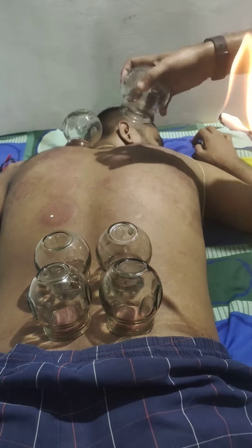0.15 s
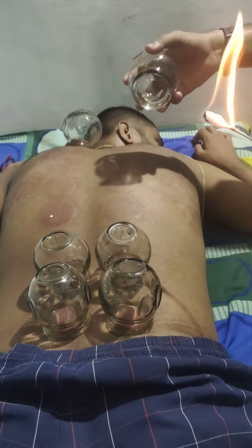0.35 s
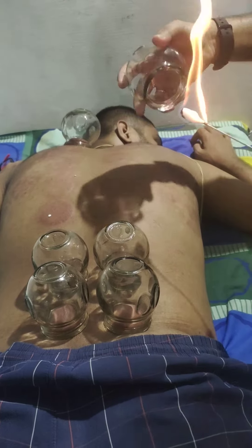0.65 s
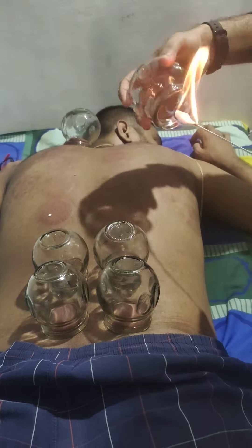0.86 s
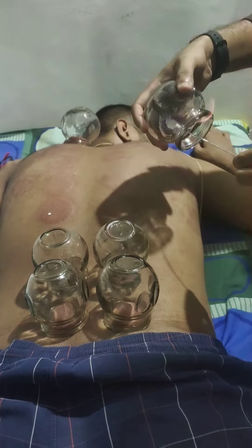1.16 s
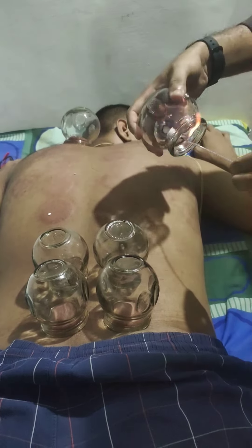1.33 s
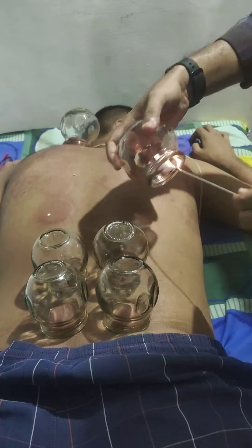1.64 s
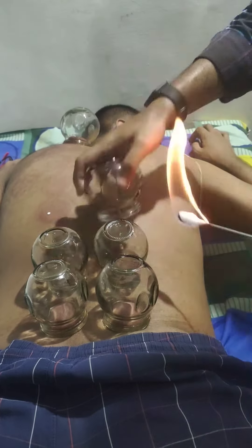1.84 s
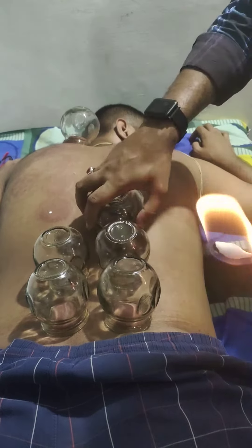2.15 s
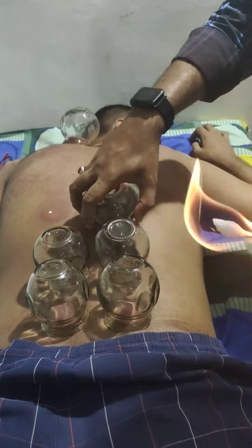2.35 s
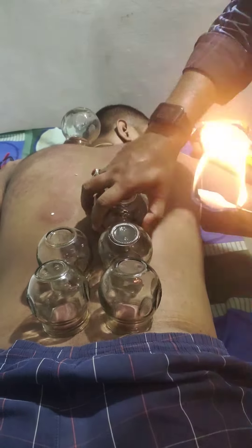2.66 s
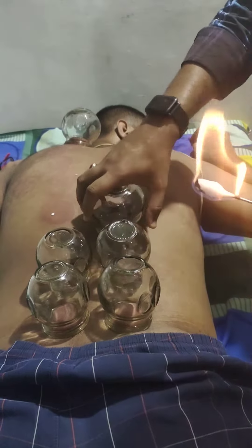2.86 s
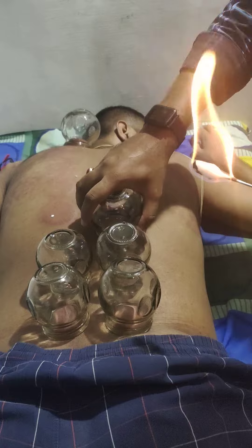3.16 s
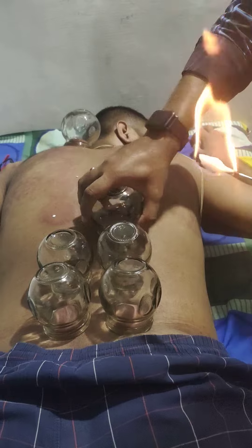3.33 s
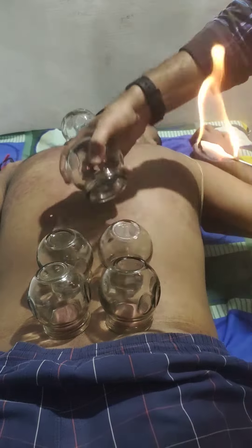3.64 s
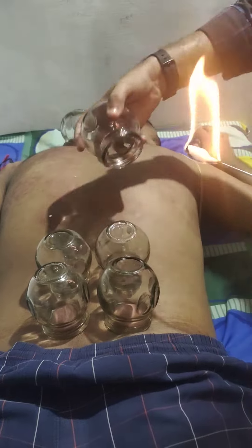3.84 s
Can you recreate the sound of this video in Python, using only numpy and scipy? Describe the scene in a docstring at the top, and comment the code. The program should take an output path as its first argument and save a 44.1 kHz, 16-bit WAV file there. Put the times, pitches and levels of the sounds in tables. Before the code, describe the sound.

Glass cups clink and knock close by in a small room. At first there is only a faint fan hum, distant cricket chirps and a soft flame flutter. From about 1.9 to 3.3 seconds, the cups chatter together in short bursts. At 3.5 seconds one pulls off the skin with a brief hiss and a rising pop, then bounces against another, the clinks quickening and fading by 3.8 seconds.

```python
"""A small bare room, during fire cupping. A glass cup is set on a back and chatters against its
neighbours as it is shifted. Pulled off, it sucks air past its rim, pops with a rising note and
bounces against the next cup. Behind it the torch flame flutters, a fan throbs, thin tones hang
in the room and a cricket chirps faintly."""
import sys
import numpy as np
from scipy import signal
from scipy.fft import rfft, irfft, next_fast_len
from scipy.io import wavfile
from scipy.ndimage import map_coordinates

SR = 44100
rng = np.random.default_rng(int(sys.argv[2]) if len(sys.argv) > 2 else 0)


def master(y):
    """Save y as 16-bit WAV."""
    cut = np.clip(np.atleast_2d(y).T, -1, 1)
    pcm = np.round(cut * 32767)  # scale
    wavfile.write(sys.argv[1], SR, pcm.astype(np.int16))


N = 176400
T = np.arange(N) / SR

# The bright colour of the rim hiss and the ticks. Each row: frequency in Hz, gain in dB.
BRIGHT_COLOUR = [(200, -13), (900, -5.5), (1800, -0.5), (3300, -10.5), (5000, -5), (7000, 1), (10000, -7.5),
                 (11500, 1.5), (13300, 1.5), (15300, -10)]


def from_db(db):
    """Decibels to gain."""
    return 10 ** (np.asarray(db) / 20)


def rms_one(x):
    """Scale to unit power."""
    return x / np.sqrt(np.mean(x ** 2) + 1e-20)


def pan(db):
    """Left and right gains; positive dB leans left."""
    return from_db(np.array([[.5], [-.5]]) * db)


def fader(points):
    """Ride the gain through (seconds, dB) points, silent outside them."""
    return from_db(np.interp(T, *np.transpose(points), left=-200, right=-200))


def at_hz(points, hz):
    """Read a table on a log-frequency axis."""
    freqs, values = np.transpose(points)
    return np.interp(np.log(hz + 1), np.log(freqs), values)


def colour(x, spectrum, size=16384):
    """Minimum-phase EQ through (Hz, dB) points."""
    gain = from_db(at_hz(spectrum, np.fft.rfftfreq(size, 1 / SR)))
    cepstrum = irfft(np.log(gain))
    cepstrum[1:size // 2] *= 2
    cepstrum[size // 2 + 1:] = 0
    impulse = irfft(np.exp(rfft(cepstrum)))
    padded = next_fast_len(N + size, real=True)
    return irfft(rfft(x, padded) * rfft(impulse, padded), padded)[..., :N]


def clicks(rows):
    """One impulse per (seconds, dB) row."""
    out = np.zeros(N)
    for s, db in rows:
        out[int(s * SR)] += from_db(db)
    return out


def ring(x, hz, t60):
    """A resonator: a unit click starts a sine of height 1 that falls 60 dB in t60 seconds."""
    radius, angle = np.exp(-np.log(1000) / (t60 * SR)), 2 * np.pi * hz / SR
    return signal.lfilter([0, np.sin(angle)], [1, -2 * radius * np.cos(angle), radius ** 2], x + 1e-18)


def ambient(spectrum):
    """Stereo noise, alike in both ears at the low end only."""
    # Stereo image. Each row: frequency in Hz, left-right correlation.
    likeness = [(60, 0.97), (130, 0.96), (290, 0.87), (640, 0.78), (1410, 0.054), (15000, .05)]
    alike = np.clip(at_hz(likeness, np.fft.rfftfreq(N, 1 / SR)), 0, 1)
    mid, side = rfft(rng.standard_normal((2, N)))
    noise = irfft(np.sqrt(1 + alike) * mid + np.sqrt(1 - alike) * side * [[1], [-1]])
    return rms_one(colour(noise, spectrum))


def waver(x, depth_db=3.2, band_hz=130, step_s=.1, size=1024):
    """Narrow bands swell and fade independently."""
    hz, s, bands = signal.stft(x, SR, nperseg=size)
    grid = np.meshgrid(hz / band_hz, s / step_s, indexing="ij")
    db = depth_db * map_coordinates(rng.standard_normal((size, size)), grid, order=1)
    return rms_one(signal.istft(bands * from_db(db), SR)[1][:, :N])


def delay(x, ms):
    """The same sound, arriving later."""
    return np.interp(T - ms / 1000, T, x)


def both_ears(x):
    """The sound reaches the right side a moment after the left."""
    return np.array([x, delay(x, ms=.204)])


def room(x, predelay_s=.00327):
    """Bare walls answer with dense early scatter and a longer tail."""
    age = np.maximum(T - predelay_s, 0)
    response = 0
    for db, t60 in (-10, .029), (-5, .26):
        fade = np.exp(-np.log(1000) * age / t60) * (age > 0)
        flat_noise = ambient([(1, .01), (2, .017)])
        response += from_db(db) * fade / np.linalg.norm(fade) * flat_noise
    return signal.fftconvolve(np.atleast_2d(x), response[:, :SR], axes=1)[:, :N]


def whine():
    """Faint unsteady tones hang in the room."""
    # The tones. Each row: frequency in Hz, level in dB.
    tones = [(1710, -73.5), (1854, -74.5), (2057, -78.5)]
    return sum(from_db(db) * waver(ring(rng.standard_normal((2, N)), hz, t60=.098)) for hz, db in tones)


def fan(hum_hz=92.9, turn_s=.252, first_dip_s=.012):
    """A low hum that throbs once a turn, over a wash of moving air."""
    # The hum's slow drift. Each row: time in seconds, level in dB.
    hum_level = [(0, -47), (.5, -47), (.9, -53.5), (1.7, -50.5), (2.2, -46.5), (4, -50)]
    # Colour of the moving air. Each row: frequency in Hz, gain in dB.
    air_colour = [(25, -46.5), (55, -3.5), (85, -3), (150, -4), (230, -15.5), (320, -5), (512, -12),
                  (1100, -16.5), (1800, -19.5), (2400, -20.5), (4000, -28.5), (9000, -37.5), (14000, -32)]
    t = T - first_dip_s

    def partial(turn_rates, phase):
        return np.sin(2 * np.pi * (hum_hz + turn_rates / turn_s) * t + phase)
    sidebands = sum(partial(k, rng.uniform(0, 2 * np.pi)) for k in (-5, -3, -2, 3, 4))
    swing = np.pi * t / turn_s
    throb = np.sin(swing) * (partial(0, 0) + from_db(-17) * sidebands)
    dip_fill = from_db(-20) * np.cos(swing) * partial(0, -np.pi / 2)
    air = from_db(-59) * waver(ambient(air_colour))
    return fader(hum_level) * (throb + dip_fill) * pan(db=1.36) + air


def cricket(pitch_hz=3231, sag_hz_per_s=850, blur_hz=60, rise_s=.056, fade_db_per_s=132):
    """Far chirps, blurred by the walls, that swell, sag in pitch and fade."""
    # The chirps. Each row: start in seconds, level in dB.
    chirps = [(-.1, -55), (0.102, -58), (0.321, -57.5), (0.539, -56), (0.752, -54.5), (0.979, -69.5),
              (1.197, -65), (1.418, -56), (1.659, -65), (1.869, -58), (2.062, -58), (2.321, -68),
              (2.72, -59.5), (2.949, -65.5), (3.132, -52.5), (3.37, -69), (3.798, -55)]
    level, hz = np.zeros(N), np.full(N, float(pitch_hz))
    for start, db in chirps:
        age = np.maximum(T - start, 0)
        level += from_db(db - fade_db_per_s * np.maximum(age - rise_s, 0)) * np.minimum(age / rise_s, 1)
        hz = np.where(T > start, pitch_hz - sag_hz_per_s * age, hz)
    lowpass = signal.butter(2, blur_hz, fs=SR, output="sos")
    blur = rms_one(signal.sosfilt(lowpass, rng.standard_normal((2, 2, N))))
    tone = (blur[0] + 1j * blur[1]) * np.exp(2j * np.pi * np.cumsum(hz) / SR)
    octave = from_db(-21) * tone ** 2 / 2
    return level * (tone + octave).real


def flame():
    """The torch roars softly each time it is swung through the air."""
    # The swings. Each row: centre in seconds, spread in seconds, level in dB.
    swings = [(0.653, 0.054, -58), (0.95, 0.1, -55), (2.108, 0.043, -51.5), (2.2, 0.13, -57)]
    # The dark roar. Each row: frequency in Hz, gain in dB.
    roar_colour = [(40, -4), (90, 7.5), (180, -1), (330, -2), (550, -9), (1200, -18), (4000, -38)]
    swells = sum(from_db(db) * np.exp(-.5 * ((T - s) / spread) ** 2) for s, spread, db in swings)
    return ambient(roar_colour) * swells


def ticks():
    """Tiny bright ticks, a little to the left."""
    # The ticks. Each row: time in seconds, level in dB before the EQ.
    cues = [(2.585, -27), (3.8175, -29)]
    tick = colour(clicks(cues), BRIGHT_COLOUR)
    return (tick + room(tick)) * pan(db=6)


def rubbing(slips_per_s=800, lowpass_hz=1500, edge_s=.005):
    """Between contacts the cups drag on each other in tiny, soft, uneven slips."""
    # The drags. Each row: start in seconds, end in seconds, force in dB.
    drags = [(1.931, 2.023, -23.5), (2.496, 2.563, -24), (2.604, 2.664, -26), (2.766, 2.865, -29.5),
             (3.032, 3.098, -35), (3.215, 3.28, -29)]
    effort = sum(from_db(db) * np.clip(np.minimum(T - start, end - T) / edge_s + .5, 0, 1)
                 for start, end, db in drags)
    slips = (rng.random(N) < slips_per_s / SR) * rng.uniform(.5, 1, N) * rng.choice([-1, 1], N)
    return signal.sosfilt(signal.butter(2, lowpass_hz, fs=SR, output="sos"), effort * slips + 1e-18)


def leak():
    """The seal breaks and air hisses in past the rim, exciting the cup's cavity."""
    # The inrush. Each row: time in seconds, level in dB.
    rush_level = [(3.5, -89), (3.517, -48.5), (3.53, -41), (3.537, -24), (3.546, -24.5), (3.553, -28),
                  (3.565, -37.5), (3.58, -35.5), (3.6, -96), (3.62, -88)]
    # Cavity resonances. Each row: frequency in Hz, level in dB against the jet.
    cavity = [(2590, -7.5), (4020, -17.5), (4740, -16), (5670, -14), (7000, -7), (11130, -8), (13200, -8.5),
              (13600, -4.5)]
    # The hiss leans left, most at the top. Each row: frequency in Hz, left over right in dB.
    lean = [(500, 4.5), (1500, 5), (11200, 7.5), (12500, 19.5)]
    jet = rms_one(colour(rng.standard_normal(N), BRIGHT_COLOUR))
    resonance = sum(from_db(db) * rms_one(ring(jet, hz, t60=.04)) for hz, db in cavity)
    hiss = fader(rush_level) * rms_one(jet + resonance)
    wet = both_ears(hiss) + from_db(-8.5) * room(hiss)
    return np.array([colour(channel, [(hz, side * db) for hz, db in lean])
                     for channel, side in zip(wet, (.5, -.5))])


def pop(start_s=3.547, start_hz=248, open_hz=630.6, rise_s=.00747):
    """The air in the cup rings, rising as the mouth comes free; the skin thumps back."""
    # Envelope of the air note. Each row: time in seconds, level in dB.
    note_level = [(3.547, -31), (3.554, -18.5), (3.563, -18.5), (3.568, -14.5), (3.575, -18), (3.579, -29),
                  (3.63, -60)]
    hz = open_hz - (open_hz - start_hz) * np.exp(-np.maximum(T - start_s, 0) / rise_s)
    note = np.sin(2 * np.pi * np.cumsum(hz * (T > start_s)) / SR) * fader(note_level)
    thump = ring(clicks([(3.545, -28)]), hz=205, t60=.055)
    direct = note + thump
    return direct * pan(db=-3.6) + from_db(-15) * room(direct)


def glass_ring(contacts, scatter_db=6.5, detune=.022):
    """Three cups of slightly different size ping at each contact; the lifted one rings on."""
    # Glass modes. Each row: frequency in Hz, relative level in dB, 60 dB decay time in seconds.
    modes = [(6400, -40, .024), (6995, -31.5, 0.016), (13400, -41, 0.014), (14250, -31.5, 0.015)]
    # The right side is shaded from the highest ringing. Each row: frequency in Hz, gain in dB.
    right_shade = [(8000, -6), (12500, -8.5)]
    strikes = clicks([(s, db * 1.74) for s, db in contacts])  # hard contacts ring far more
    glass = ring(clicks([(3.636, -56)]), hz=4040, t60=.92)  # the lifted cup
    for hz, db, t60 in modes:
        for cup in -1, 0, 1:
            # Each contact touches another spot on the glass.
            spot_gain = from_db(scatter_db * rng.uniform(-1.14, 1, N)) * rng.choice([-.5, .5], N)
            glass += from_db(db) * ring(strikes * spot_gain, hz * (1 + detune * cup), t60)
    left, right = (both_ears(glass) + from_db(1) * room(glass)) * pan(db=5)
    return np.array([left, colour(right, right_shade)])


def knocks(force):
    """The force between the cups comes out as knocks; near surfaces and the room answer."""
    # Body of a knock. Each row: frequency in Hz, relative gain in dB.
    body = [(100, -43.5), (350, -26.5), (550, -15), (800, -6), (1100, -5.5), (1550, 4.5), (2100, 0.5),
            (2700, -7.5), (3500, -18.5), (4050, -15.5), (5000, -17)]
    # Early reflections. Each row: left delay in ms, left gain, right delay in ms, right gain.
    echoes = [(1.9, 0.1, 0.776, 0.21), (4.33, 0.29, 4.087, 0.29), (6.13, 0.28, 5.3, 0.11),
              (13.3, 0.16, 11.6, 0.12)]
    # Resonances that colour the room's answer, each a frequency in Hz.
    room_modes = [1047, 1163.5, 1280, 1354, 1436, 1576, 1632, 1719, 1805, 1981, 2098, 2276]
    knock = from_db(18.5) * colour(force, body)
    out = knock * from_db([[0], [-8]])  # louder on the left
    for left_ms, left_gain, right_ms, right_gain in echoes:
        out += [left_gain * delay(knock, left_ms), right_gain * delay(knock, right_ms)]
    for k, hz in enumerate(room_modes):
        placement = pan(db=25.5) * [[1], [1 if k % 2 else -.5]]
        out += from_db(-58.5) * ring(knock, hz, t60=.12) * placement
    return out + from_db(-.5) * room(knock) * pan(db=3)


def cups(spread_ms_at_0db=.06):
    """Glass chatters on glass: each contact is a short push that knocks and rings the cups."""
    # The contacts. Each row: time in seconds, strength in dB.
    contacts = [(1.9357, -3), (1.9552, -7), (1.9623, -9.5), (1.9863, -5.5), (1.9943, -13), (2.0204, -15.5),
                (2.045, -13), (2.2584, -17), (2.2822, -16), (2.2904, -14.5), (2.48, -17), (2.4918, -12),
                (2.5074, -8), (2.5176, -4.5), (2.5254, -8), (2.5349, -4), (2.5448, -11.5), (2.551, -12.5),
                (2.6138, -12.5), (2.6438, -13), (2.7545, -16.5), (2.7623, -10.5), (2.7691, -13.5),
                (2.7842, -8.5), (2.8012, -10), (2.8136, -11.5), (2.8238, -6.5), (2.8425, -15),
                (2.8333, -18.5), (3.0334, -12), (3.045, -15), (3.0609, -12.5), (3.0736, -21), (3.0852, -15),
                (3.2258, -19), (3.2416, -17), (3.2551, -14.5), (3.2697, -16.5), (3.5943, -0.5),
                (3.6361, 0.5), (3.67, -1.5), (3.694, -3.5), (3.7125, -8), (3.7274, -12), (3.739, -18),
                (3.7495, -15.5), (3.7563, -15)]
    force = rubbing()
    for s, db in contacts:
        width = spread_ms_at_0db * SR / 1000 * from_db(-db * .47)  # harder hits are shorter
        near = int(s * SR) + np.arange(-64, 64)
        push = np.exp(-.5 * ((near - s * SR) / width) ** 2)
        force[near] += from_db(db) * push / push.sum()
    return glass_ring(contacts) + knocks(force)


def scene():
    """The cupping close by, the room behind it."""
    return cups() + leak() + pop() + ticks() + flame() + fan() + whine() + cricket()


def record(dry, low_cut_hz=45, high_cut_hz=15500):
    """The deep bass is rolled off and the top is cut steeply."""
    thin = signal.sosfilt(signal.butter(2, low_cut_hz, "high", fs=SR, output="sos"), dry)
    return signal.sosfilt(signal.ellip(10, .2, 80, high_cut_hz, fs=SR, output="sos"), thin)


dry = scene()
out = record(dry)
master(out)
```